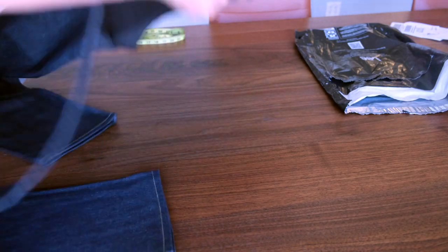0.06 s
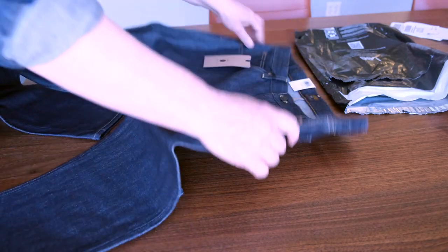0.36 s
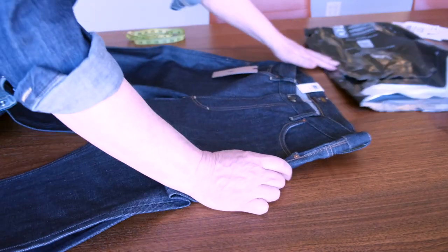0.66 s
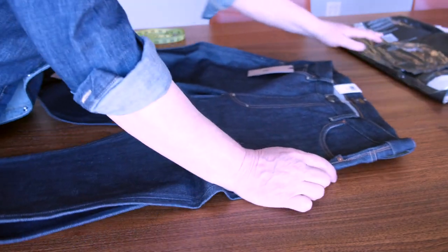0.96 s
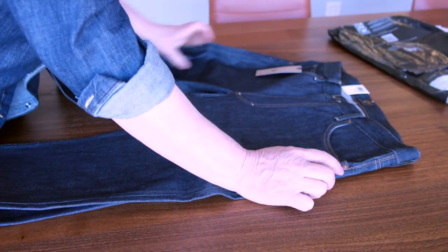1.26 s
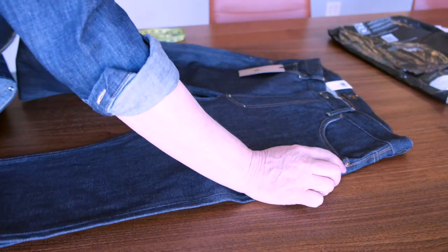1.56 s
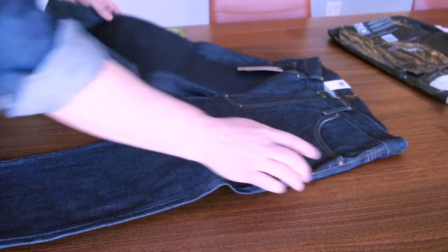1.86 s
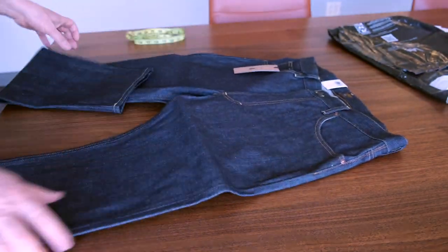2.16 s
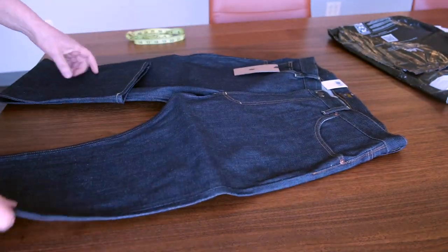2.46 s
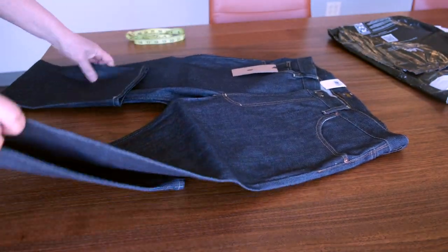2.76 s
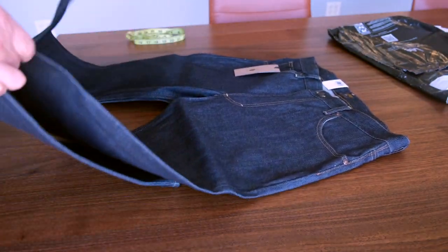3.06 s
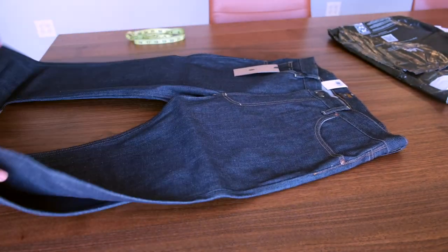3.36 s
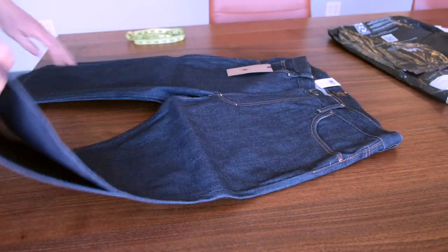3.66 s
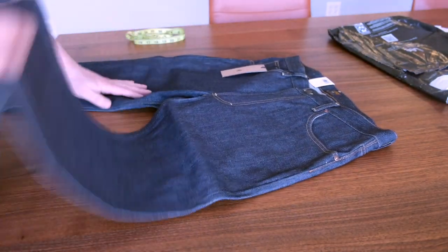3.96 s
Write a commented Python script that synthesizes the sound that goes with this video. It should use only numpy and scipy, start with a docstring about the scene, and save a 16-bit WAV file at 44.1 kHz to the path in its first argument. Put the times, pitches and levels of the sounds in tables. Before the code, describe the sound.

Heavy denim rustles and flaps as jeans are laid on a wooden table with one hard knock. A plastic-wrapped garment slides aside, then smoothing strokes, light bumps and one sharp tick follow, close by in a faintly humming room.

```python
"""A wooden table in a quiet, faintly humming room, a stereo microphone pair close by.
Heavy jeans are laid out: the denim flaps, rubs and hisses, and hands and hems bump the table top,
once hard. From 0.6 to 1.1 s a plastic-wrapped garment is pushed aside across the wood; trim and
plastic tick faintly. The jeans are then smoothed, stroke after stroke, with more light bumps.
Near the end a small hard part, perhaps a rivet, gives one sharp tick."""
import sys
import numpy as np
from scipy import signal
from scipy.fft import rfft, irfft
from scipy.io import wavfile
from scipy.ndimage import uniform_filter1d

SR = 44100
rng = np.random.default_rng(int(sys.argv[2]) if len(sys.argv) > 2 else 0)


def master(y):
    """Save y as 16-bit WAV."""
    cut = np.clip(np.atleast_2d(y).T, -1, 1)
    pcm = np.round(cut * 32767)  # scale
    wavfile.write(sys.argv[1], SR, pcm.astype(np.int16))


N = 176400
HZ, TIME = np.fft.rfftfreq(N, 1 / SR), np.arange(N) / SR


def denim():
    """Each move swells and fades: folds flap, cloth rubs on wood, threads catch and slip in a hiss."""
    # Each row: peak time, rise and fall in seconds, then flap, rub and hiss levels in dB.
    strokes = [(0.009, 0.037, 0.12, -38.5, -42.5, -43.5), (0.119, 0.019, 0.1, -48, -47.5, -47.5),
               (0.198, 0.025, 0.3, -47.5, -43.5, -42), (0.345, 0.065, 0.071, -40, -35, -46),
               (0.452, 0.016, 0.038, -38, -36.5, -46.5), (0.504, 0.045, 0.068, -35.5, -41, -54.5),
               (0.592, 0.035, 0.12, -43, -47.5, -51.5), (1.087, 0.12, 0.066, -57, -43.5, -48),
               (1.27, 0.011, .05, -60, -56, -50.5), (1.375, 0.084, 0.12, -47, -42.5, -45.5),
               (1.487, 0.017, 0.026, -40, -41.5, -59), (1.5, 0.085, 0.15, -44.5, -39.5, -46),
               (1.626, 0.046, 0.062, -41, -44, -49.5), (1.761, 0.056, 0.12, -49, -48, -53),
               (1.894, 0.068, 0.031, -58, -49, -54.5), (1.932, 0.01, 0.11, -49, -43.5, -48.5),
               (2.109, 0.079, 0.098, -49, -44, -45.5), (2.278, 0.054, 0.069, -60, -49.5, -48),
               (2.399, 0.049, 0.02, -60, -47.5, -49.5), (2.46, 0.045, 0.056, -53, -46, -49.5),
               (2.56, 0.038, 0.055, -50, -39, -47.5), (2.689, 0.1, 0.06, -52, -46, -46.5),
               (2.782, 0.065, 0.078, -51.5, -49.5, -49), (2.927, 0.064, 0.077, -52, -47.5, -53.5),
               (3.08, 0.25, 0.082, -50.5, -58, -53), (3.262, 0.16, 0.1, -48.5, -45.5, -50),
               (3.367, 0.039, 0.036, -42, -44.5, -44), (3.447, 0.11, 0.13, -49.5, -43.5, -48.5),
               (3.525, 0.012, 0.02, -65, -44, -49), (3.745, 0.14, 0.062, -47.5, -40.5, -44.5),
               (3.835, 0.073, 0.17, -46, -47, -47)]
    # The cloth's three spectra. Each row: frequency in Hz, relative level in dB.
    flap_spectrum = [(60, -34), (200, -19), (400, 5.5), (600, 1), (800, -0.5), (1100, -17), (2000, -54),
                     (16000, -83)]
    rub_spectrum = [(200, -6.5), (600, -9.5), (900, -1.5), (1250, -1.5), (1650, -2.5), (2200, -7.5),
                    (3200, -13), (5000, -29), (16000, -55)]
    hiss_spectrum = [(500, -22), (2000, 2.5), (3300, 0.5), (5400, 0.5), (7000, -3.5), (9000, -6),
                     (11500, -8), (13500, -11), (16000, -19)]
    swell_shape = 1.56  # 1 = pointed, 2 = bell
    power = np.zeros((3, N))
    for peak, rise, fall, *levels in strokes:
        from_peak = abs(TIME - peak) / np.where(TIME < peak, rise, fall)
        swell = np.exp(-np.minimum(from_peak ** swell_shape, 20))
        power += (amp(levels)[:, None] * swell) ** 2
    flap_gain, rub_gain, hiss_gain = np.sqrt(power)
    flap = friction(flap_spectrum, slips_per_s=560, spread_db=.5, share=.25, patchy_db=3)
    rub = friction(rub_spectrum, slips_per_s=1000, spread_db=2.5, share=.17, patchy_db=1.04)
    hiss = friction(hiss_spectrum, slips_per_s=2500, spread_db=-.5, share=.22, patchy_db=1.46)
    return flap_gain * amp(-1.5) * flap + rub_gain * rub + hiss_gain * pan(3.5) * hiss


def swishes():
    """The ribs of the weave glide over each other in a high, airy band."""
    # Each row: peak time and half length in seconds, band centre in Hz, level in dB.
    glides = [(1.883, .04, 7600, -56), (1.958, .04, 7900, -54), (3.02, 0.13, 11500, -57),
              (3.355, 0.049, 9000, -54)]
    half_width_hz = 2600
    out = np.zeros((2, N))
    for peak, half_length, hz, db in glides:
        band = stereo_noise(np.exp(-((HZ - hz) / half_width_hz) ** 2))
        out += amp(db) * np.exp(-((TIME - peak) / half_length) ** 2) * band
    return out


def bag():
    """Plastic film drags over the wood with a bright hiss; its sizzle grows faster with speed."""
    # Each row: time in seconds, drag on the wood in dB, hiss of the film in dB.
    slide = [(.595, -50, -64), (0.614, -38.5, -41.5), (.645, -42, -40.5), (.68, -44.5, -41.5),
             (.76, -41.5, -40.5), (.84, -38.5, -39.5), (.9, -40, -40.5), (.93, -38, -42.5),
             (.98, -39.5, -44), (1.05, -44, -52), (1.13, -55, -72)]
    # The bag's three spectra. Each row: frequency in Hz, relative level in dB.
    drag_spectrum = [(100, -10), (400, -4.5), (700, -4.5), (1000, -1), (1600, -0.5), (2200, -5),
                     (3200, -7.5), (5000, -11), (16000, -55)]
    film_spectrum = [(600, -42), (2200, 1.5), (3500, 1), (5500, 3.5), (7500, 0.5), (9500, -6),
                     (12000, -7.5), (16000, -36)]
    sizzle_spectrum = [(5000, -30), (8000, -7), (10000, -1), (12600, 0), (13800, -6), (16000, -9)]
    full_film_db, full_sizzle_db, sizzle_growth = -40, -45.3, 1.8
    times, *levels = np.transpose(slide)
    drag_gain, film_gain = (amp(np.interp(TIME, times, db, left=-120, right=-120)) for db in levels)
    sizzle_gain = amp(full_sizzle_db) * (film_gain / amp(full_film_db)) ** sizzle_growth
    sizzle = friction(sizzle_spectrum, slips_per_s=3000, spread_db=1, share=.2, patchy_db=1, side=-.75)
    drag = friction(drag_spectrum, slips_per_s=1600, spread_db=-1.5, share=.11, patchy_db=.8, side=-.57)
    film = friction(film_spectrum, slips_per_s=3000, spread_db=5, share=.15, patchy_db=.7, side=-.85)
    return drag_gain * pan(.2) * drag + film_gain * pan(-.8) * film + sizzle_gain * sizzle


def knocks():
    """A hand or hem lands with a damped thud and a little crack; the blow spreads and the table rings."""
    # Each row: start in seconds, level in dB, thud pitch in Hz, thud T60 in seconds,
    # crack level relative to the thud in dB, top of the crack in Hz.
    bumps = [(.109, -30, 395, 0.037, -25, 3000), (.123, -29, 730, 0.012, -17, 3000),
             (.197, -26.5, 1380, 0.011, -5, 5000), (0.294, -26, 830, 0.014, -18, 3000),
             (.3345, -3.3, 940, .0085, -9, 2100), (.3365, -20, 1800, .01, -10, 3000),
             (.3425, -23, 1800, .012, -10, 3000), (.3625, -24, 1300, 0.0056, -3, 5000),
             (1.49, -31, 464, 0.035, -25, 2000), (1.675, -27, 575, 0.012, -24, 3000),
             (1.924, -25, 580, 0.011, -9, 3000), (1.968, -33, 870, 0.02, -20, 4000),
             (2.125, -27, 610, 0.017, -18, 4000), (2.134, -25.5, 1060, 0.0062, -5, 4000),
             (2.472, -31.5, 1180, 0.017, -25, 3000), (2.927, -31.5, 1665, 0.041, -20, 2980),
             (3.175, -16.3, 700, .016, -13, 4500), (3.178, -21, 1250, .01, -6, 5000),
             (3.192, -30, 720, .03, -25, 2000), (3.208, -29, 630, 0.026, -25, 2000),
             (3.216, -25, 756, 0.012, -18, 3000), (3.444, -28.5, 494, 0.018, -25, 3000)]
    # The table top. Each row: frequency in Hz, relative level in dB, T60 in seconds.
    wood_modes = [(427, -18.5, 0.02), (438, -16.5, 0.038), (727, -33, 0.05), (903, -35, 0.18),
                  (1070, -34, 0.062), (1466, -34, 0.018), (1906, -20, 0.02)]
    contact_rise_s, spread_s, crack_t60_s = .0002, .0046, .016
    spot_spread_db = -2  # each spot on the table favours other modes
    out, t = np.zeros(N), np.arange(SR // 6) / SR
    for start, db, hz, t60, crack_db, crack_hz in bumps:
        wood = sum(amp(spot_spread_db * rng.standard_normal()) * ring([mode], t) for mode in wood_modes)
        wood *= 1 - np.exp(-t / spread_s)
        crack = signal.lfilter(*signal.butter(3, crack_hz, fs=SR), rng.standard_normal(len(t)))
        crack *= amp(crack_db - 60 * t / crack_t60_s)
        blow = (ring([(hz, 0, t60)], t) + crack) * (1 - np.exp(-t / contact_rise_s))
        add(out, start, -amp(db) * (blow + wood))
    return signal.sosfilt(signal.butter(2, 260, "highpass", fs=SR, output="sos"), out)


def ticks():
    """Metal trim and plastic ping off nearby surfaces and send a falling bending wave through the wood."""
    # Each row: start in seconds, level in dB, left over right in dB.
    hits = [(0.1898, -33, 2), (0.448, -38, -4), (0.636, -38, -3), (0.892, -33, 1), (3.7644, -13, 3)]
    # Each row: frequency in Hz, relative level in dB, T60 in seconds before the added damping.
    ping_modes = [(4750, -16.5, .014), (5080, 5.5, 0.0087), (6300, 0, 0.0046), (7900, -0.5, 0.0045),
                  (9640, -2.5, 0.006), (10300, -3, 0.0054)]
    # Each row: delay in seconds, level relative to the direct ping in dB.
    echoes = [(.0017, -13), (.0075, -20), (.0126, -19), (.017, -23)]
    damping_t60_s, scatter_db, scatter_t60_s = .007, -21, .015
    bend_hz, bend_peak_s, bend_db = 2100, .00275, -17.5  # the wave falls through bend_hz at its peak
    out, t = np.zeros((2, N)), np.arange(SR // 25) / SR
    age = t / bend_peak_s
    bend = np.sin(8 * np.pi * bend_hz * bend_peak_s / (1 + age)) * age * np.exp(1 - age)
    ping = ring(ping_modes, t) * amp(-60 * t / damping_t60_s)
    ping = signal.lfilter(*signal.butter(3, 3400, "highpass", fs=SR), ping)
    for start, db, side_db in hits:
        paths = unit(rng.standard_normal((2, len(t))))
        paths *= amp(scatter_db - 60 * t / scatter_t60_s) * (t > .0008)
        paths[:, 0] = 1  # straight to the microphones
        for delay, echo_db in echoes:
            paths[:, round(delay * SR)] += amp(echo_db)
        tick = signal.fftconvolve(paths, ping[None], axes=1)[:, :len(t)]
        add(out, start, amp(db) * pan(side_db) * (tick / 2 + amp(bend_db) * bend))
    return signal.sosfilt(signal.cheby1(8, 1, 10960, fs=SR, output="sos"), out)


def room(x, early_db, early_t60_s, tail_db):
    """Adds quick reflections from table and walls, then the short tail of the room."""
    # Each row: frequency in Hz, T60 of the tail in seconds.
    decay = [(100, 0.47), (500, 0.5), (1500, 0.4), (5000, 0.37), (15000, 0.47)]
    t = TIME[:SR // 2]
    early, tail = rng.standard_normal((2, 2, len(t)))
    hz, frame_s, frames = signal.stft(tail, SR, nperseg=256)
    frames *= amp(-60 * frame_s / read(decay, hz)[:, None])
    tail = signal.istft(frames, SR, nperseg=256)[1][:, :len(t)] * (t > .008)
    early = early * amp(-60 * t / early_t60_s) * (t > .003)
    reflections = amp(early_db) * unit(early) + amp(tail_db) * unit(tail)
    response = mic_pair(reflections)[:, :len(t)] / np.sqrt(len(t))
    return x + signal.fftconvolve(np.atleast_2d(x), response, axes=1)[:, :N]


def air():
    """Room tone: a steady low rumble with two droning bands, like ventilation."""
    # Each row: frequency in Hz, relative level in dB.
    rumble_spectrum = [(15, -9), (30, -17), (38, -19), (47, 1.5), (68, -15), (85, -2.5), (120, -1.5),
                       (200, 0.5), (235, -3), (310, -2.5), (360, -9.5), (550, -13.5), (1000, -22),
                       (2500, -24.5), (6000, -36.5), (12000, -40.5), (16000, -50)]
    # Each row: centre in Hz, width in Hz, level in dB.
    drones = [(177.8, 14, -57.5), (299, 30, -53)]
    out = amp(-42) * stereo_noise(amp(read(rumble_spectrum, HZ)))
    for hz, width, db in drones:
        out += amp(db) * stereo_noise(1 / (1 + (2 * (HZ - hz) / width) ** 2))
    return out


def friction(spectrum, slips_per_s, spread_db, share, patchy_db, side=1):
    """Tiny uneven slips take a share of a smooth rub's power; shifting folds add patches of colour."""
    slips = rng.standard_normal((2, N)) * amp(spread_db * np.minimum(rng.exponential(1, N), 4))
    slips *= rng.random(N) < slips_per_s / SR
    rub = np.sqrt(share) * unit(slips) + np.sqrt(1 - share) * rng.standard_normal((2, N))
    frames = signal.stft(rub, nperseg=512)[2]
    patches = rng.standard_normal(frames.shape[1:])
    for axis in (0, 1):  # smooth over frequency, then time
        patches = uniform_filter1d(patches, size=6, axis=axis)
    rub = signal.istft(frames * amp(patchy_db * unit(patches)), nperseg=512)[1][:, :N]
    return unit(mic_pair(rub, amp(read(spectrum, HZ)), side))


def mic_pair(x, gain=1, side=1):
    """Colours two unrelated signals and blends them into one source, left (side 1) or right (-1)."""
    # Each row: frequency in Hz, left-right correlation from 0 to 1.
    likeness = [(60, 0.99), (300, 0.99), (640, 0.94), (1400, 0.84), (2300, 0.79), (3300, 0.85),
                (6800, 0.58), (10000, 0.26), (15000, 0.59)]
    # Each row: frequency in Hz, lead of the nearer microphone in radians for a side of 1 or -1.
    lead = [(100, 0), (1600, 0.3), (2400, 1.5), (3500, 1.66), (5000, 1.56), (7000, 1.5), (10000, 3),
            (15000, 4.5)]
    same = read(likeness, HZ)
    shared, apart = rfft(x, N) * gain * np.sqrt([(1 + same) / 2, (1 - same) / 2])
    right_lag = np.exp(-1j * side * read(lead, HZ))
    return irfft([shared + apart, (shared - apart) * right_lag], N)


def stereo_noise(gain):
    """Noise at the microphones, shaped by a gain per frequency, at rms 1."""
    return unit(mic_pair(rng.standard_normal((2, N)), gain))


def ring(modes, t):
    """Sum of dying sines."""
    return sum(amp(db - 60 * t / t60) * np.sin(2 * np.pi * hz * t) for hz, db, t60 in modes)


def amp(db):
    """Decibels to gain."""
    return 10 ** (np.asarray(db) / 20)


def unit(x):
    """Scales to rms 1."""
    return x / np.sqrt(np.mean(x ** 2) + 1e-20)


def read(points, hz):
    """Reads a table on a log-frequency axis."""
    point_hz, value = np.transpose(points)
    return np.interp(np.log(hz + 1), np.log(point_hz + 1), value)


def add(mix, start_s, sound):
    """Mixes a sound in at its start time."""
    part = mix[..., round(start_s * SR):][..., :sound.shape[-1]]
    part += sound[..., :part.shape[-1]]


def pan(db):
    """Channel gains for a level of left over right."""
    return amp(np.array([[db / 2], [-db / 2]]))


def scene():
    """Cloth and bag close and dry over the room tone; bumps and ticks also sound the room."""
    return (denim() + swishes() + bag() + air()
            + room(knocks(), early_db=-12, early_t60_s=.057, tail_db=-10.5)
            + room(ticks(), early_db=-9, early_t60_s=.02, tail_db=-7.5))


def record(dry):
    """The recorder cuts off steeply at the top of the treble."""
    lowpass = signal.firwin(511, 15780, window=("kaiser", 9), fs=SR)
    return signal.oaconvolve(dry, lowpass[None], "same")


dry = scene()
out = record(dry)
master(out)
```